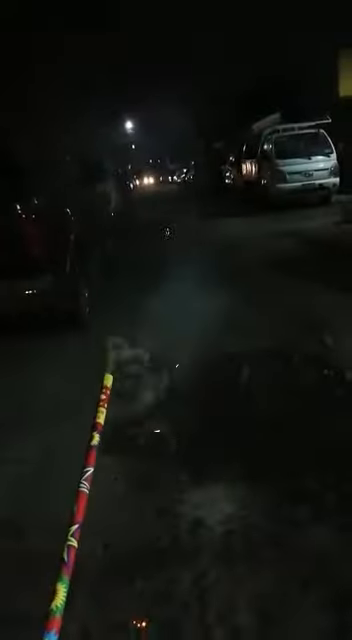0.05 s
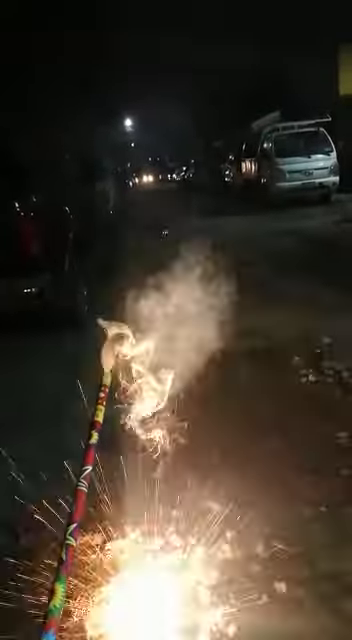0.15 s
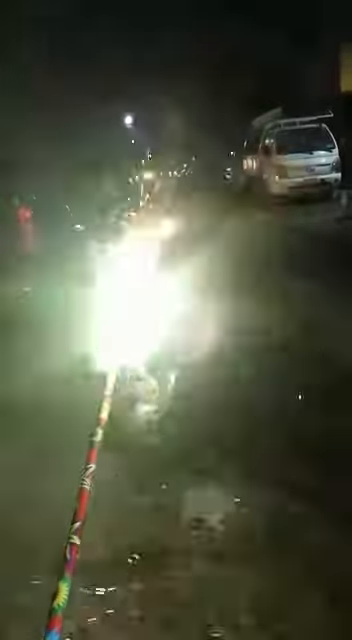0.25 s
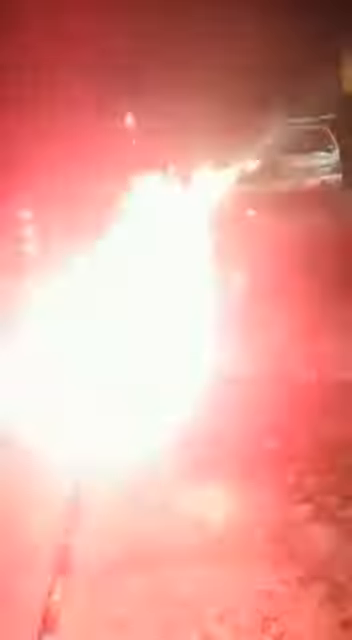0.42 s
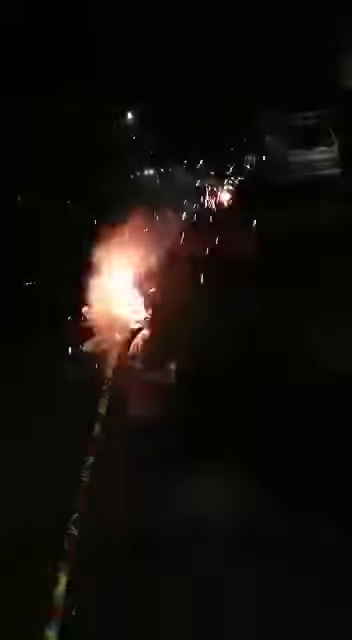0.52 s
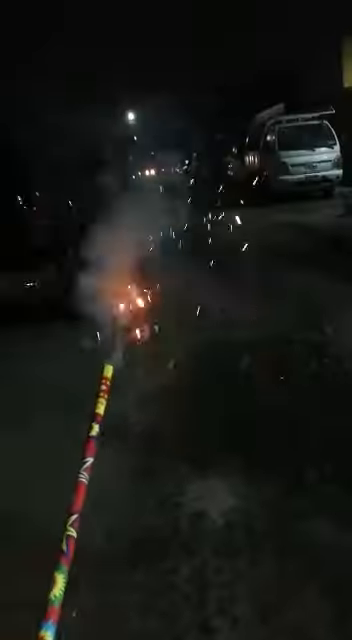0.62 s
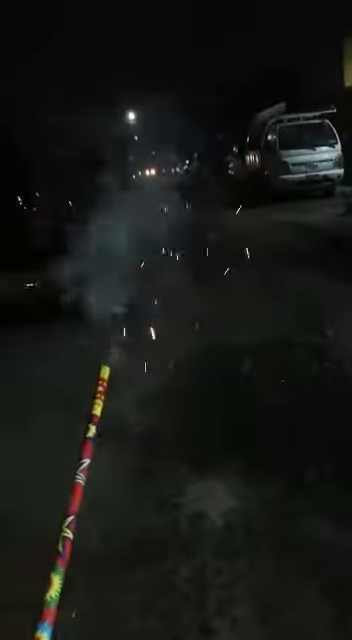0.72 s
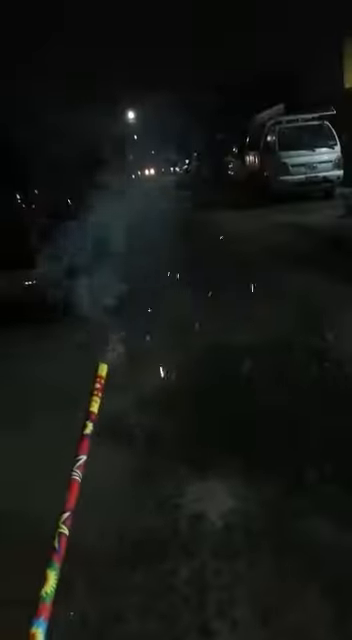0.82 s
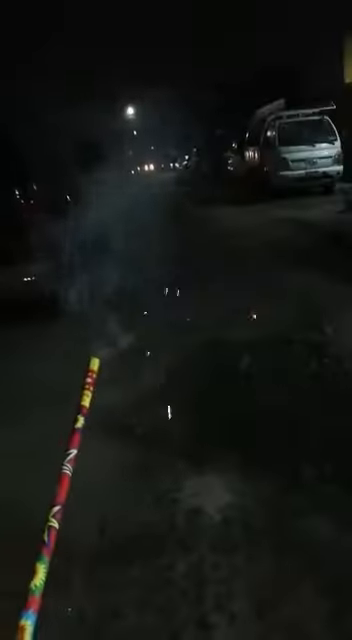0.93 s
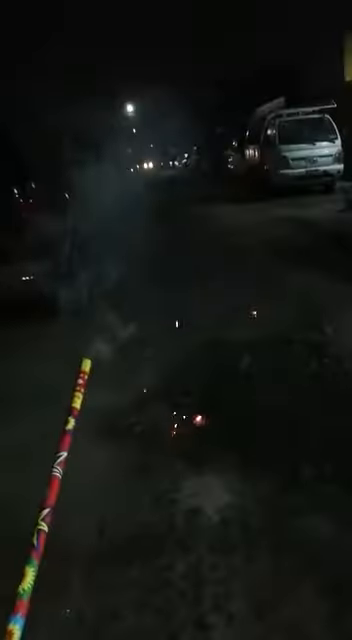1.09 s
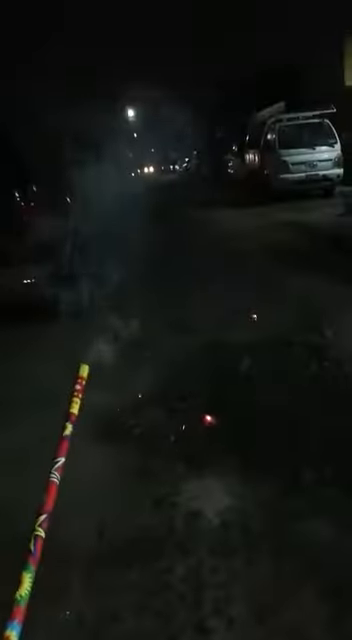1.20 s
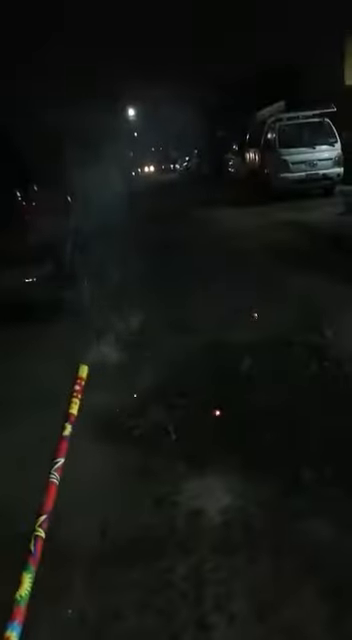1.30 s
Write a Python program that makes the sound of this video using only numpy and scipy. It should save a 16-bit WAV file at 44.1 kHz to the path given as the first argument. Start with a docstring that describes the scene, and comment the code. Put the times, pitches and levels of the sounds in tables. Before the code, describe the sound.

A hand-held firework tube fires with a sharp, loud bang, followed at once by a weaker pop. Street echoes blend into a short hiss, leaving faint distant traffic. The close bang overloads the microphone.

```python
"""A hand-held firework tube fires on a street at night: a sharp bang, then a weaker pop an eighth
of a second later. Ground, cars and walls slap the bang back, then many small echoes blend into
a short hiss. The bang overloads the microphone, and its automatic volume control briefly turns
everything down, including the distant traffic and a low hum."""
import sys
import numpy as np
from scipy import signal
from scipy.fft import rfft, irfft
from scipy.io import wavfile
from scipy.ndimage import uniform_filter1d, minimum_filter1d

SR = 44100
rng = np.random.default_rng(int(sys.argv[2]) if len(sys.argv) > 2 else 0)


def store_pcm(level_fs):
    """Save levels as 16-bit WAV."""
    pcm = np.round(np.clip(level_fs, -1, 1) * 32767).astype(np.int16)
    wavfile.write(sys.argv[1], SR, np.atleast_2d(pcm).T)


N = 59535
T = np.arange(N) / SR
HZ = np.fft.rfftfreq(N, 1 / SR)


def firework():
    """The tube fires twice, and nearby surfaces each throw back a single echo."""
    # The bang and the pop: t/s, crack/dB, hold/s, decay/s, treble cut/(dB per kHz), ring/dB, thump/dB
    shots = [(0.2356, 16, 0.0035, .0013, 0.72, 13, 3), (0.3619, 7, 0.00042, 0.0011, 2.4, 5, 8)]
    # Single echoes: t/s, crack/dB, ring/dB, left over right/dB, thump/dB
    echoes = [(0.248, 0, -28, 1, -28), (0.2537, 9, -22, 20, 3), (0.2581, 3.5, -30, -9, -46),
              (0.2629, 0.5, -7, -1, -38), (0.2668, 8, -21, 6, -23), (0.2765, -3, 6, 3, 5.5),
              (0.2802, 0.5, 4, 1, -32), (0.2895, -8.5, -21, 15, -40), (0.3081, -6, -33, -15, -40),
              (0.3305, -8.5, -25, -7, -40), (0.3777, -8, -4.5, -3, -15)]
    out = np.zeros((2, N))
    for start, *shot in shots:
        add(out, start, blast(*shot))
    for start, crack_db, ring_db, pan_db, thump_db in echoes:
        echo = blast(crack_db, hold_s=0.00057, decay_s=0.00046, cut_db_per_khz=0.84,
                     ring_db=ring_db, thump_db=thump_db, pan_db=pan_db)
        add(out, start, echo)
    return out


def blast(crack_db, hold_s, decay_s, cut_db_per_khz, ring_db, thump_db, pan_db=0):
    """One pressure wave: a crack that makes the microphone thump and its small opening ring."""
    # Tone of the crack: f/Hz, level/dB
    crack_tone = [(60, -6), (400, -6), (680, -2), (1200, 5.5), (2800, 2), (4000, 4.5), (6500, 1),
                  (10000, 10), (12500, -16), (15500, -9.5)]
    ring_hz, ring_width_hz = 8900, 3200
    crack = burst(colour(crack_tone, cut_db_per_khz), hold_s, decay_s)
    resonance = 1 / (1 + (2 * (HZ - ring_hz) / ring_width_hz) ** 2)
    ring = burst(resonance, hold_s, decay_s)
    snap = amp(crack_db) * crack + amp(ring_db) * ring
    return snap * sides(pan_db) + amp(thump_db) * thump(T[:crack.shape[1]])


def burst(spectrum, hold_s, decay_s, size=8192):
    """Churning air: noise that starts at once, holds and dies away."""
    shape = np.exp(-np.maximum(T[:size] - hold_s, 0) / decay_s)
    puff = noise(spectrum, likeness=0.27, left_delay_s=0.00013)[:, :size] * shape
    return puff * np.sqrt(np.mean(shape ** 2) / np.mean(puff ** 2))  # the shape alone sets the energy


def thump(t):
    """A sharp pressure shock, then a low thump as the overloaded microphone swings back and settles."""
    shock_db, shock_s = 4.5, 0.000056
    rise_s, swing_s, settle_s = 0.00057, 0.0026, 0.21
    shock = amp(shock_db) * (1 - t / shock_s) * np.exp(-t / shock_s)
    swing_back = np.exp(-t / swing_s)
    settling = swing_s / settle_s * np.exp(-t / settle_s)
    return shock + (settling - swing_back) * (1 - np.exp(-t / rise_s))


def street_echoes():
    """Crowded echoes last while the wave runs along the house fronts, then die away."""
    # Swells of echoes after each shot and from the far end of the street:
    # t/s, level/dB, rise/s, hold/s, fade during the hold/(dB per s), treble cut/(dB per kHz)
    swells = [(0.238, 1, 0.014, 0.096, 133.5, 0.21), (0.364, -9, 0.0056, 0.12, 39, 0.35),
              (0.479, -16, 0.023, 0.028, 26, 1), (0.75, -45.5, 0.021, .03, 40, 1.5)]
    # Tone of the echoes: f/Hz, level/dB
    echo_tone = [(40, -13.5), (330, -3.5), (600, -10), (900, 1.5), (1300, 4), (2400, -0.5), (4000, -0.5),
                 (7000, -4.5), (9500, 1.5), (11500, -5.5), (15000, -31.5)]
    # How long the street takes to fade by 60 dB: f/Hz, time/s
    ring_times = [(100, .5), (1200, 0.62), (3000, 0.67), (6000, 0.59), (10000, 0.53), (15000, 0.5)]
    flicker_db = 1.16
    drop_db, drop_s = 10.5, 0.11  # an extra fade after the hold
    out = np.zeros((2, N))
    for start, level_db, rise_s, hold_s, fade_db_per_s, cut_db_per_khz in swells:
        flicker = unit(uniform_filter1d(rng.standard_normal(N), size=40))
        hiss = noise(colour(echo_tone, cut_db_per_khz), likeness=0.28, left_delay_s=-0.00014)
        hiss *= unit(amp(flicker_db * flicker))
        hz, t, bands = signal.stft(hiss, SR, nperseg=256)  # so each pitch can fade at its own speed
        after_hold = np.maximum(t - hold_s, 0)
        fade_db = fade_db_per_s * np.minimum(t, hold_s) + drop_db * np.minimum(after_hold / drop_s, 1)
        ring_out_db = 60 * after_hold / read(ring_times, hz)[:, None]
        _, swell = signal.istft(bands * amp(-fade_db - ring_out_db), SR, nperseg=256)
        add(out, start, amp(level_db) * np.minimum(T / rise_s, 1) * swell[:, :N])
    return out


def colour(tone, cut_db_per_khz):
    """Left and right strength of each frequency in a firework sound, with the treble turned down."""
    # How the microphone's two sides differ in tone, the right being brighter: f/Hz, left over right/dB
    mic_tone = [(100, 0), (550, 0.5), (1150, -3), (2400, -4), (4000, -1), (9500, -1.5), (11500, -9),
                (15000, -28)]
    return amp(read(tone, HZ) - cut_db_per_khz * HZ / 1000) * sides(read(mic_tone, HZ))


def traffic(level_db=-35.5):
    """Distant cars blend into a steady rumble."""
    # Tone of the rumble: f/Hz, level/dB
    tone = [(20, -2.5), (45, -12), (65, -3), (92, -9.5), (130, -8.5), (230, -12), (400, -23), (500, -19.5),
            (620, -27.5), (850, -24), (1300, -22.5), (1800, -29), (3000, -37), (4500, -41.5), (6500, -44),
            (8200, -42.5), (9300, -36.5), (10500, -43), (12000, -52), (15400, -62)]
    # How the two sides differ in loudness: f/Hz, left over right/dB
    balance = [(200, 0.5), (500, -5.5), (1100, -3.5), (2400, -3.5), (4000, -1), (9000, 0), (12500, -8.5)]
    # How alike the two sides are: f/Hz, likeness (1 = the same)
    likeness = [(40, 1), (130, 0.95), (270, 0.81), (600, -0.3), (1100, 0.85), (2000, 0.25), (10000, 0.034)]
    spectrum = amp(read(tone, HZ)) * sides(read(balance, HZ))
    return amp(level_db) * noise(spectrum, read(likeness, HZ))


def hum(pitch_hz=127.9, wander_hz=5.44, waver_db=3):
    """A low tone, like an engine, that wavers in pitch and loudness."""
    # How the hum swells and fades: t/s, level/dB
    levels = [(0, -46), (.6, -39), (.86, -45.5), (.96, -35), (1.13, -35.5), (1.35, -58)]
    cycles = np.cumsum(pitch_hz + wander_hz * drift(size=1200)) / SR
    tone = unit(np.sin(2 * np.pi * cycles) * amp(waver_db * drift(size=900)))
    return amp(np.interp(T, *np.transpose(levels))) * tone


def noise(spectrum, likeness, left_delay_s=0):
    """Stereo noise of average strength 1, with a chosen tone and likeness between the sides."""
    shared, separate = rfft(rng.standard_normal((2, N)))
    left = shared * np.exp(-2j * np.pi * HZ * left_delay_s)
    right = likeness * shared + np.sqrt(1 - likeness ** 2) * separate
    pair = irfft(np.array([left, right]) * spectrum, N)
    return pair / np.sqrt(np.mean(pair ** 2))


def drift(size):
    """Slow random wandering, smoothed over `size` samples."""
    return unit(uniform_filter1d(uniform_filter1d(rng.standard_normal(N), size), size))


def amp(db):
    """Turns decibels into a number to multiply by."""
    return 10 ** (np.asarray(db) / 20)


def unit(x):
    """Scales a signal to an average strength (rms) of 1."""
    return x / np.sqrt(np.mean(x ** 2, axis=-1, keepdims=True) + 1e-20)


def read(table, hz):
    """Looks up frequencies in a table, gliding between its rows by pitch."""
    row_hz, values = np.transpose(table)
    return np.interp(np.log(hz + 1), np.log(row_hz), values)


def sides(db):
    """Left and right volumes that make the left louder by `db`."""
    return amp(np.array([np.atleast_1d(db), -np.atleast_1d(db)]) / 2)


def add(mix, start_s, sound):
    """Mixes a sound in at a given time."""
    part = mix[:, round(start_s * SR):][:, :sound.shape[1]]
    part += sound[:, :part.shape[1]]


def scene():
    """Everything that reaches the microphone."""
    return firework() + street_echoes() + traffic() + hum()


def record(dry):
    """The volume dips on loud sounds and recovers; peaks are squashed and the highest treble is cut."""
    threshold_db, dip_share, deepest_db = -30, 0.62, 14
    hold_s, recover_db_per_s = 0.03, 178
    ceiling, top_hz = 0.74, 15500
    power = uniform_filter1d((dry ** 2).mean(0), size=200)
    level_db = 10 * np.log10(abs(power) + 1e-12)
    wanted_dip_db = np.clip(dip_share * (level_db - threshold_db), 0, deepest_db)
    half_hold = round(hold_s * SR / 2)
    held_db = -minimum_filter1d(-wanted_dip_db, 2 * half_hold + 1, origin=half_hold)  # deepest recent dip
    recovery_db = T * recover_db_per_s
    dip_db = np.maximum.accumulate(held_db + recovery_db) - recovery_db  # lets go at a steady speed
    dipped = dry * amp(-uniform_filter1d(dip_db, size=100))
    squashed = ceiling * np.tanh(dipped / ceiling)
    low_pass = signal.firwin(301, top_hz, window=("kaiser", 8), fs=SR)
    return signal.oaconvolve(squashed, low_pass[None], "same", axes=1)


dry = scene()
out = record(dry)
store_pcm(out)
```